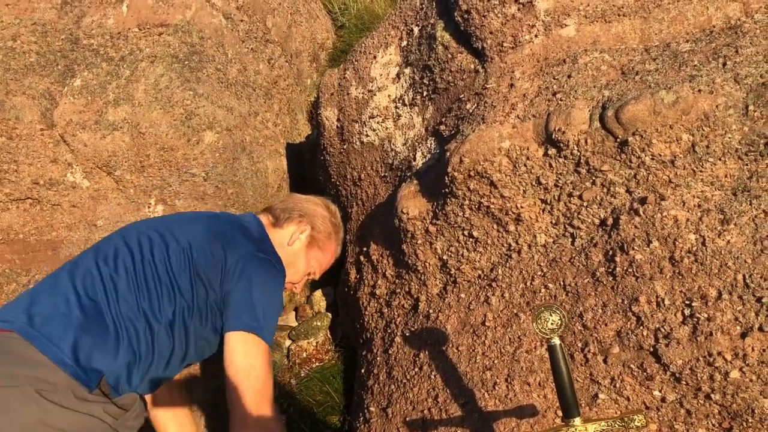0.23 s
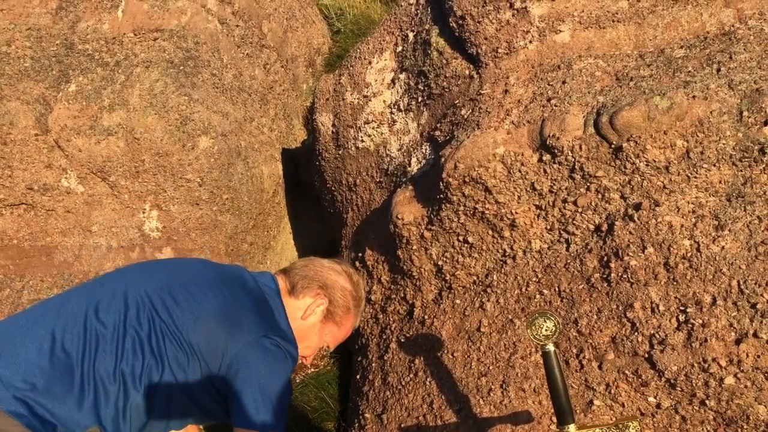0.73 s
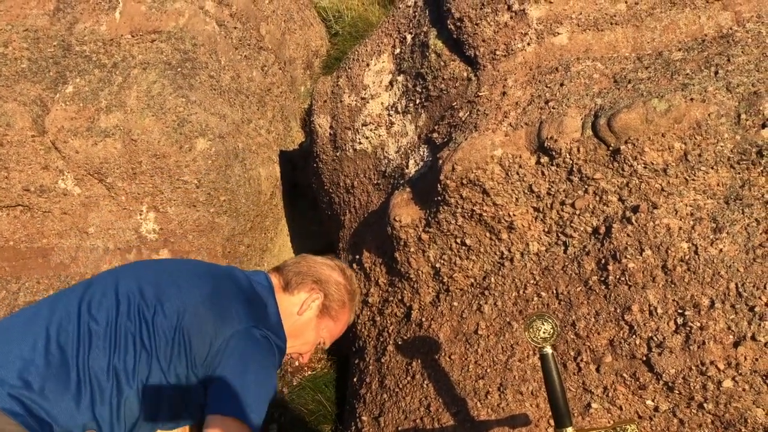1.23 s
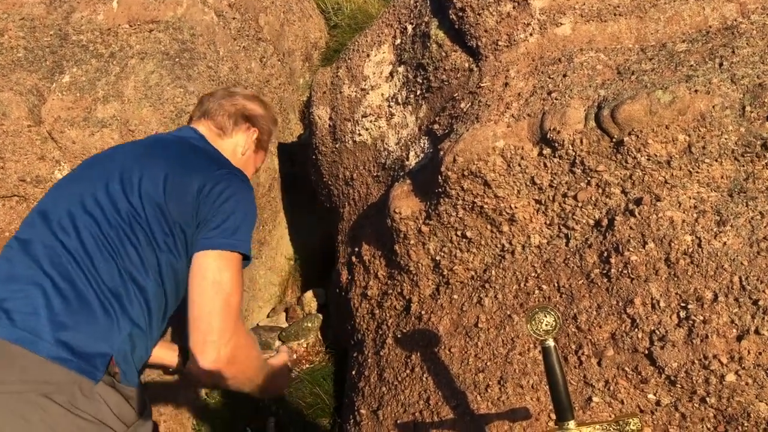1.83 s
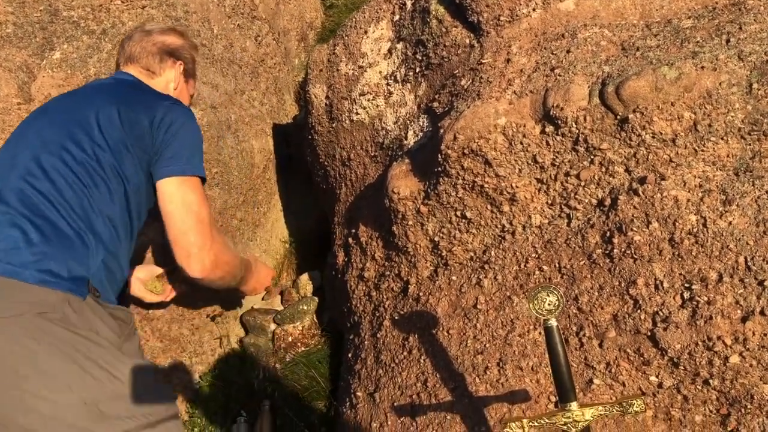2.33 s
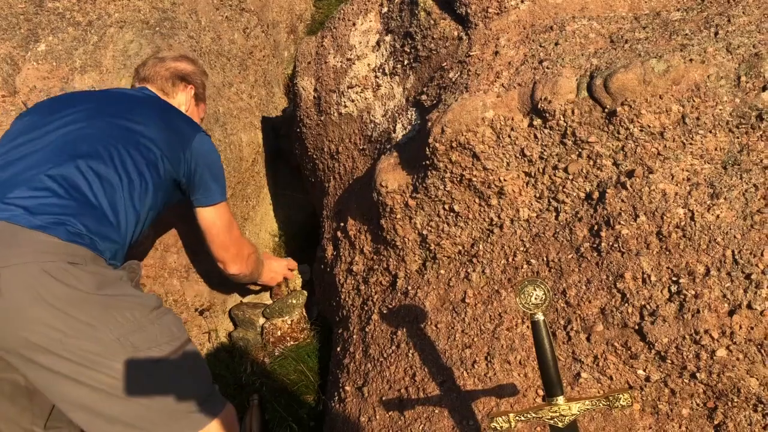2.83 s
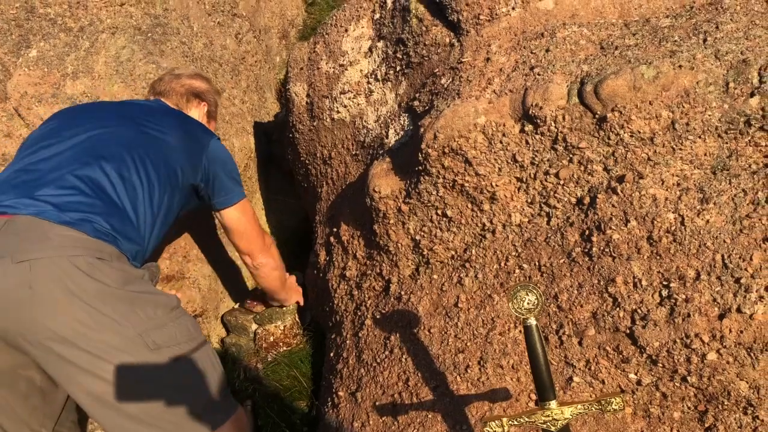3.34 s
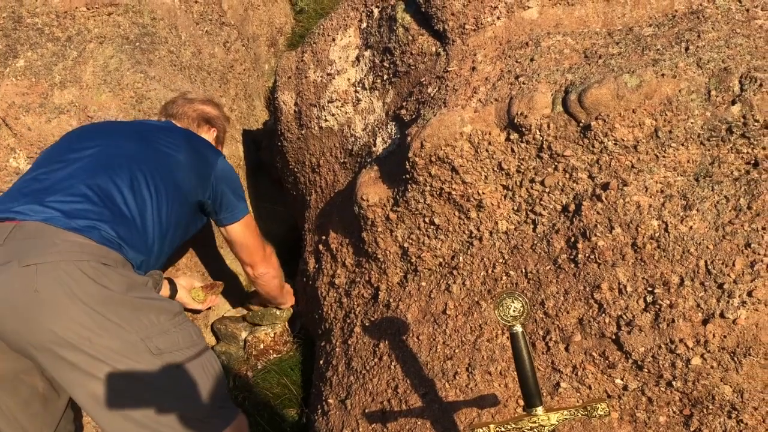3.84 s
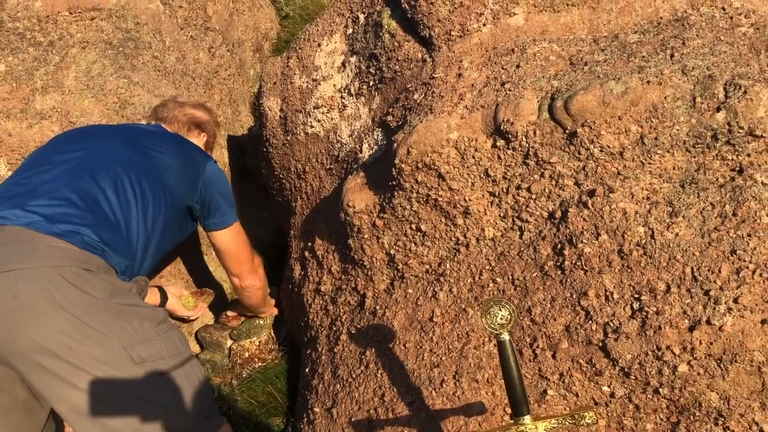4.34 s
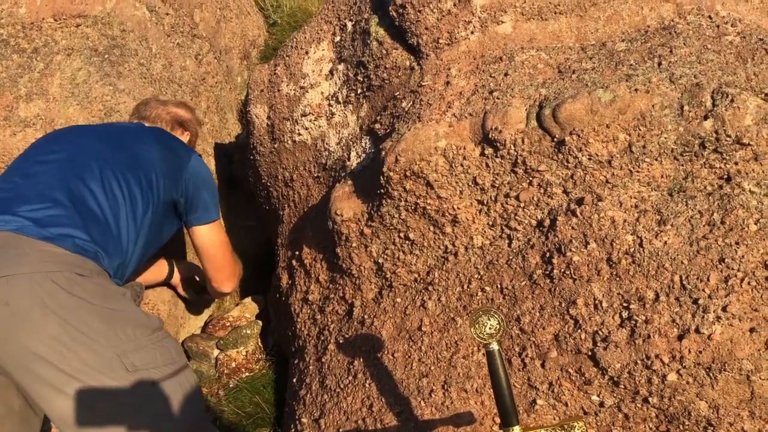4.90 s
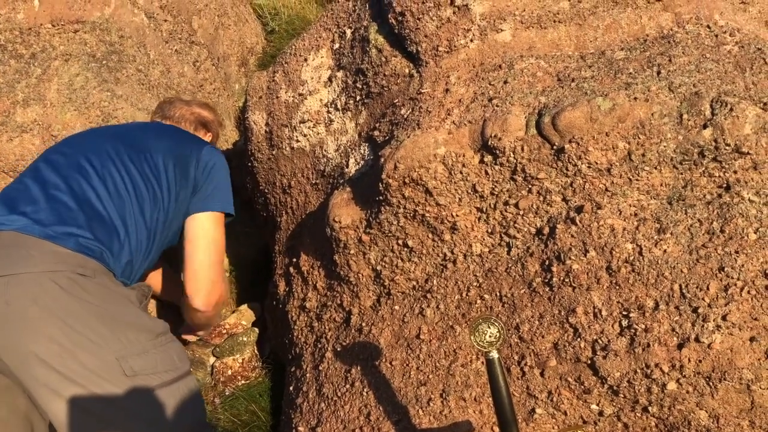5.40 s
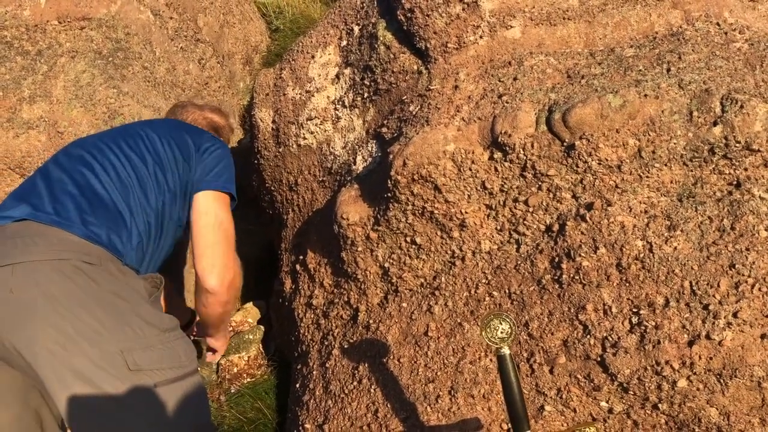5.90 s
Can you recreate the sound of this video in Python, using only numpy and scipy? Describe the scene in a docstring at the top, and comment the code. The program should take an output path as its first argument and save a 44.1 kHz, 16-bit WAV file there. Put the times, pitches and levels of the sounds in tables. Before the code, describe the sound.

Outdoors in a cleft between rocks, a microphone a step away hears a low, faint rumble of distant air. From 0 to 2.2 s there are only very soft rubs of cloth and grit, with isolated tiny snaps and one barely audible stone touch at 0.2 s. The rustle brightens around 2.3 s and again, strongest, at 2.6 to 2.7 s. At 2.98 s a stone hits stone: one hard, mid-pitched clack, far louder than everything else, with a quick rattle of rebounds until 3.1 s. Lighter knocks follow at 3.25 to 3.4 s, then 3.65 to 4.05 s, with short gritty grinding and faint high chip rings; the one at 3.86 s is strongest. From 4.1 to 5.45 s it is almost silent, with slight rustle and grains. At 5.49 to 5.67 s several dry knocks and a scrape sound, then faint ticks until about 6.1 s.

```python
"""Outdoors, in a cleft between rocks: fist-sized stones are set on a small pile, a step from a microphone.
Knocks are short contact pulses that excite damped modes; chips ring singly at high modes.
Grinding is a dense train of random slips, partly ringing the stones; snapping grit is band-passed noise.
Cloth and grit rustle as shaped random grains while the body shifts, over a low rumble of far air."""
import sys
import numpy as np
from scipy import signal
from scipy.fft import rfft, irfft
from scipy.io import wavfile
from scipy.ndimage import uniform_filter1d

SR = 44100
rng = np.random.default_rng(int(sys.argv[2]) if len(sys.argv) > 2 else 0)


def wrap_up_sound(samples):
    """Save the sound to the file named by the first command line argument, as 16-bit audio."""
    columns = np.atleast_2d(samples).T
    # keep every value between -1 and 1, then stretch to whole-number steps
    tamed = np.clip(columns, -1, 1)
    steps = np.round(tamed * 32767).astype(np.int16)
    wavfile.write(sys.argv[1], SR, steps)


N = 271656  # samples


def gain_of(db):
    """Level definition: amplitude ratio from decibels."""
    return 10 ** (np.asarray(db) / 20)


def evened(x):
    """Normalisation to unit root-mean-square amplitude."""
    return x / np.sqrt(np.mean(x ** 2) + 1e-20)


def read(points, hz):
    """Spectral interpolation: levels of a (frequency, level) table on a logarithmic frequency axis."""
    f, level = np.transpose(points)
    return np.interp(np.log(hz + 1), np.log(f + 1), level)


def curve(rows, column):
    """Envelope interpolation: one column of a table, sample by sample; near silence outside its span."""
    rows = np.array(rows)
    return np.interp(np.arange(N) / SR, rows[:, 0], rows[:, column], left=-150, right=-150)


def add(mix, s, sound):
    """Superposition: a sound is summed into the mix from time s on."""
    part = mix[round(s * SR):][:len(sound)]
    part += sound[:len(part)]


def band(x, lo_hz, hi_hz):
    """Band-pass filtering with a Butterworth response."""
    edges = [lo_hz, min(hi_hz, SR / 2.1)]
    return signal.sosfilt(signal.butter(2, edges, "band", fs=SR, output="sos"), x)


def coloured(x, points):
    """Spectral shaping: the spectrum is weighted by a table, then brought to unit RMS."""
    weight = gain_of(read(points, np.fft.rfftfreq(len(x), 1 / SR)))
    return evened(irfft(rfft(x) * weight, len(x)))


def ring(modes, t, detune=1):
    """Modal decay: exponentially damped sines, one row a mode."""
    hz, db, t60 = (c[:, None] for c in np.transpose(modes))
    return gain_of(db - 60 * t / t60) * np.sin(2 * np.pi * hz * detune * t)


def clicks(per_s, spread_db):
    """Random impulse train: sparse clicks of random sign, a few of them large."""
    size = gain_of(spread_db * np.minimum(rng.exponential(1, N), 4)) * rng.choice([-1, 1], N)
    return size * (rng.random(N) < per_s / SR)


def strokes(rows, rise):
    """Envelope of friction strokes: linear rise in dB, hold and fade; the strongest stroke governs.

    Rows: (time full level is reached [s], hold [s], level [dB], fade [dB/s]); rise in dB/s.
    """
    t = np.arange(0, N / SR, 1 / 2000)
    full, hold, db, fade = (c[:, None] for c in np.transpose(rows))
    before = np.maximum(full - t, 0)
    after = np.maximum(t - full - hold, 0)
    gain = gain_of(db - rise * before - fade * after).max(0)
    return np.interp(np.arange(N) / SR, t, gain)


# Modes of the stones, before detuning and added damping:
# (frequency [Hz], level [dB], 60 dB decay time [s])
STONE_MODES = [(403.6, 7.5, 0.035), (640, 6, 0.11), (879, 1, .04), (1147, -4, 0.063), (1310, 5.5, 0.01),
               (1390, -5.5, 0.02), (1700, 2.5, 0.045), (1959, -11, 0.01099), (2025, -16.5, 0.012),
               (2646, -2, 0.0061), (2833, -2.5, 0.032), (3300, -9.5, 0.029), (3830, 2, 0.0047)]
# Higher modes of the pile, short and quick to build up:
# (frequency [Hz], level [dB], 60 dB decay time [s])
PILE_MODES = [(2510, 0, .011), (2900, -3, 0.016), (3380, -9, .009)]
# Reflections from rock faces close by: (delay [s], level [dB])
ROCK_ECHOES = [(.0034, -17), (.0049, -21), (.0071, -19.5)]
HARD_CYCLES, CYCLES_PER_DB = 0.44, 0.0252  # clack rise in cycles at 0 dB; softer blows last longer
REBOUND_S, DAMPING = 0.001539, 0.72  # delay of the second touch; factor on the stones' decay times
MIDDLE_T60, LOWER_T60 = 0.031, 0.016  # decay times of the two single modes [s]


def knock(db, hz, rebound_db, ring_db, tick_db, thud_db, high_db, middle_db, middle_hz, lower_db, lower_hz, chance):
    """Impact excitation: a contact pulse drives modes near its pitch, then rebounds and is reflected."""
    t, count = np.arange(4000) / SR, len(STONE_MODES)
    rise = t * hz / (HARD_CYCLES - CYCLES_PER_DB * db)
    clack = np.sin(2 * np.pi * hz * t) * rise ** 2 * np.exp(2 - 2 * rise)

    # modes far from the clack's pitch are excited less
    mode_hz = np.array(STONE_MODES)[:, :1]
    reach = gain_of(-12 * np.log2(mode_hz / hz) ** 2 + 2.502 * chance[:count, None])
    detune = 1 + 0.023 * chance[count:2 * count, None]
    body = (reach * ring(np.array(STONE_MODES) * [1, 1, DAMPING], t, detune)).sum(0)
    singles = [(middle_hz, middle_db, MIDDLE_T60), (lower_hz, lower_db, LOWER_T60)]
    body = gain_of(ring_db) * body / abs(body).max() + ring(singles, t).sum(0)
    body *= (1 - np.exp(-t / 0.00099)) ** 2  # the ring builds up while the contact lasts

    noise = chance[-len(t):]
    grit = band(noise, 2600, 6000) + 0.63 * band(noise, 3700, 12000)
    tick = grit * (gain_of(-60 * t / 0.0059) + 0.1192 * gain_of(-60 * t / 0.069))  # fast and slow decay
    thud = evened(band(noise[::-1], 220.9, 1100)) * (1 - np.exp(-t / 0.0057))
    thud *= gain_of(thud_db - 60 * t / 0.035)
    upper = gain_of(high_db) * ring(PILE_MODES, t).sum(0) * (1 - np.exp(-t / 0.00058)) ** 2

    blow = clack + upper + body + gain_of(tick_db) * tick + thud
    sound = blow.copy()
    for s, echo_db in [(REBOUND_S, rebound_db)] + ROCK_ECHOES:
        add(sound, s, gain_of(echo_db) * blow)
    return gain_of(db) * sound / abs(sound).max()


# Blows of stone on stone; the part levels are gains beside the clack:
# (time [s], peak level [dB], clack pitch [Hz], second touch [dB], ring [dB], sharp tick [dB], thud [dB],
#  pile modes [dB], single middle mode [dB], its frequency [Hz], lower mode [dB], its frequency [Hz])
STONE_BLOWS = [(0.209, -58, 950, -1, 5, -10, -20, -15, -16, 1490, -12, 993),
               (2.954, -52.5, 1600, -3.5, -8.5, -22, -24.5, -10, -7, 1730, -10, 1200),
               (2.966, -51.5, 1520, -3, -9.5, -24.5, -24.5, -14, -10, 1750, -9, 1200),
               (2.977, -6, 1500, -5, -22, -22, -29, -9.5, -1.5, 1710, -7, 1186),
               (2.989, -23, 1070, 4, -15, -26, -20, -13, -11, 1450, -20, 1145),
               (3.008, -26.5, 1280, 0, -5, -41, -27, -26, -9, 1490, -17, 1260),
               (3.014, -46, 1190, -21, -9, -24, -28, -19, -18, 1440, -15, 1200),
               (3.02, -32, 1110, -10, -2, -29.5, -19, -22, -4, 1437, -13, 1081),
               (3.028, -34, 1210, -10, -6, -22, -19, -19, -19, 1470, -19, 1235),
               (3.036, -28, 1470, -11, -15, -48, -14, -32, 5, 1627, -6, 1320),
               (3.048, -33.5, 1240, -7, 8, -36, -26, -27, -19, 1490, -15, 1350),
               (3.055, -34.5, 1560, -3, -19, -46, -26, -27, 24, 1630, -11, 1220),
               (3.077, -47.5, 1130, 8, -13, -31, -24, -18, -16, 1440, -16, 1140),
               (3.083, -43, 1040, 17, -18, -33, -28, -23, -8, 1590, -10, 1020),
               (3.103, -50, 1000, -13.5, -5, -25, -22, -20, -17, 1570, -2, 802),
               (3.217, -48.5, 1150, -19.5, -6, -17.5, -10, -18, -18, 1463, -5, 851),
               (3.252, -38.5, 1130, 11, 5.5, -28, -18, -12, -8, 1670, -19, 1170),
               (3.277, -43.5, 1100, -4, -12, -23, -17, -21, -24.5, 1440, 7, 805),
               (3.303, -35.5, 1150, -12, 2.5, -36, -20, -22, 3, 1640, -13, 1260),
               (3.362, -22, 2080, -5.5, 7.5, -23.5, -14.5, -21, -12, 1925, -10, 1217),
               (3.367, -43, 1760, -14, -8, -36, -21, -13, -1, 1670, -18, 915),
               (3.419, -29.5, 1710, -7, -4, -30.5, -2, -23, 10.5, 1715, -12, 1120),
               (3.656, -27, 1920, -10, -2.5, -48, -12, -12, -30, 1860, -5.5, 1190),
               (3.724, -36, 1780, 9, -21, -35, -6, -18, -10, 1820, -0.5, 880),
               (3.798, -34, 1500, 7, 7, -23, -28, -8, -22, 1640, 5, 980),
               (3.83, -39.5, 1680, 4, -4, -17, -13, -9, -17, 1640, -12, 888),
               (3.855, -37, 1720, 7, -11, -30, -26, -18, -9, 1670, -15, 866),
               (3.864, -18, 1440, -16, -25, -37, -29, -11, -16, 1560, -20, 1340),
               (3.877, -29, 1550, 7, -9, -37, -17, -14, -6, 1640, -11, 1350),
               (3.899, -45.5, 1070, -14, -6, -34, -24, -13, -6, 1570, -11, 1060),
               (3.929, -45, 948, 0, -15, -28, -24, -15, 12, 1620, -12, 939),
               (3.96, -46, 1340, -12, 1, -22, -28, -19, -1, 1440, -12, 1340),
               (3.968, -45, 930, -9, -6, -6, -21, -17, 3, 1430, -10, 921),
               (4.022, -28.5, 1490, -13, -24, -18, -6, -19, 5, 1507, -22, 1380),
               (4.026, -30.5, 1523, -20, -17, -34, 2, -15, -17, 1610, -21, 1340),
               (4.032, -31, 1540, -12, -22, -38, -25, -17, 7, 1655, 11, 880),
               (4.06, -48, 930, -5, 5, -25, -11, -5, -1, 1466, -12, 923),
               (5.486, -25.5, 1720, -5.5, -18, -3, -24, 0, 8, 1716, 7, 920),
               (5.552, -21, 1640, -25, 0, -20.5, -26, -4, -10, 1580, -1, 1350),
               (5.567, -50, 1010, 7, -8, -25, -26, -15, -12, 1660, -12, 996),
               (5.575, -25.5, 1900, -8, -9, -28, -13, -9, -4, 1677, -2, 1360),
               (5.587, -31.5, 1230, -14, -9, -36, -30, -11, -17, 1680, -12, 1170),
               (5.605, -53, 883, -9, 7, -22, -15, -12, -12, 1470, -9, 802),
               (5.6106, -23, 1610, -23, -25, -28, -13, -5, -12, 1640, -11, 1290),
               (5.671, -35.5, 1600, -11, -16, -31.5, -2, -21, -5, 1720, 7, 1080),
               (5.934, -47.5, 1610, -18, -12, -11, -32, -6, -11, 1610, 1, 914),
               (6.007, -54, 990, 8, -16.5, -11, -16.5, -12, -6, 1510, -13, 1020),
               (6.102, -44.5, 1240, 15, 11.5, -45.5, -28.5, -17, -17.5, 1640, -13, 1238)]


def knocks():
    """Superposition of impacts: every blow is added at its time."""
    out, chance = np.zeros(N), rng.standard_normal((len(STONE_BLOWS), 4100))
    for (s, *row), c in zip(STONE_BLOWS, chance):
        add(out, s, knock(*row, c))
    return out


# Single chips ringing out; level before the soft start: (time [s], level [dB], frequency [Hz])
CHIP_RINGS = [(2.978, -38, 5670), (3.0074, -71, 6580), (3.0354, -69, 6130), (3.0495, -68, 6750),
              (3.3857, -68, 6640), (3.6556, -57.5, 6650), (3.7973, -57.5, 8100), (3.8337, -58.5, 8200),
              (3.8774, -60, 8170), (4.0218, -55, 6480), (4.0314, -59, 6650), (4.0522, -63, 6480),
              (4.065, -65, 6660), (4.0844, -69, 6280), (5.4846, -47.5, 7660), (5.494, -56, 8000),
              (5.5513, -61, 7800), (5.612, -62, 8000)]


def chinks():
    """Free vibration of a single mode: a damped high sine with a soft start."""
    out, t = np.zeros(N), np.arange(3000) / SR
    onset = 1 - np.exp(-t / 0.00045)
    for s, db, hz in CHIP_RINGS:
        add(out, s, ring([(hz, db, 0.024)], t)[0] * onset)  # 60 dB decay time in s
    return out


# Stones rocking and grinding while they settle:
# (time full level is reached [s], hold [s], level [dB], fade [dB/s])
GRIND_STROKES = [(2.99, 0.028, -49.5, 232), (3.045, 0.021, -61, 249.5), (3.24, 0.065, -66, 220),
                 (3.375, 0.0018, -52, 499.5), (3.658, 0.025, -57.5, 500), (3.735, .002, -56, 800),
                 (3.78, .01, -59, 300), (3.8, 0.087, -50, 700), (3.935, .002, -56, 450),
                 (3.97, .002, -54, 600), (4.04, 0.014, -54.5, 270), (5.497, 0.0031, -51, 900),
                 (5.578, 0.017, -49, 700), (5.63, 0.0022, -57.5, 900), (5.68, .002, -54.5, 896),
                 (6.0, .08, -77, 300), (6.11, .002, -65, 261)]
# Spectrum of rough faces sliding: (frequency [Hz], level per Hz [dB])
SLIP_SPECTRUM = [(120, -35.5), (200, -3), (343, 5), (759, -6), (880, 4.5), (1320, -9), (1680, -3.5),
                 (1900, -10), (2700, -14), (3400, -27.5), (5000, -40), (6500, -68.5), (11000, -120)]
# Modes of small chips: (frequency [Hz], level [dB], 60 dB decay time [s])
CHIP_MODES = [(6216, -7, 0.02014), (6695, 0, 0.014), (8120, -5, 0.023), (12910, -2.5, 0.0351)]
GRIND_RISE, GRIND_CHIPS_DB = 2200, -25  # rise [dB/s]; chips against the grind [dB]


def grind():
    """Stick-slip friction: dense uneven slips of rough faces, some ringing a damped stone or chip mode."""
    t = np.arange(3000) / SR
    stone_modes = ring(np.array(STONE_MODES) * [1, 1, 0.6], t) * (1 - np.exp(-t / 0.00035))
    stones = evened(sum(signal.oaconvolve(clicks(146.6, 0.95), m)[:N] for m in stone_modes))
    slips = coloured(clicks(2600, 3), SLIP_SPECTRUM)
    chips = evened(sum(signal.oaconvolve(clicks(99.35, 3), m)[:N] for m in ring(CHIP_MODES, t)))
    friction = evened(slips + 0.7 * stones) + gain_of(GRIND_CHIPS_DB) * chips
    return strokes(GRIND_STROKES, GRIND_RISE) * friction


# Single grains of grit snapping:
# (time [s], peak level [dB], pitch [Hz], decay time constant before filtering [s])
GRIT_SNAPS = [(0.027, -48, 11100, 0.0016), (0.074, -50, 6900, 0.00073), (0.18, -50.5, 5930, 0.00098),
              (0.202, -48, 8780, 0.00094), (0.381, -42.5, 3600, 0.00037), (0.388, -47, 9020, 0.0014),
              (0.8425, -46, 6500, 0.0019), (0.9472, -50, 3980, 0.0015), (1.177, -53, 5930, 0.00133),
              (1.268, -45.5, 5400, 0.004), (1.373, -56, 9900, 0.0014), (1.73, -48.5, 10600, 0.0021),
              (1.9325, -54.5, 9910, 0.0013), (2.162, -51.5, 6010, 0.0013), (2.192, -53, 10500, 0.0013),
              (2.2594, -60, 5360, 0.00115), (2.295, -45, 5100, 0.00091), (2.301, -41.5, 5200, 0.0022),
              (2.745, -45, 5900, 0.00057), (2.79, -64, 7780, 0.0015), (3.2084, -46, 6200, 0.0031),
              (3.245, -55, 4885, 0.00134), (3.6845, -56.5, 6640, 0.0015), (3.7798, -55, 8210, 0.0011),
              (3.854, -44, 3660, 0.00078), (4.906, -55, 4110, 0.001205), (5.042, -54, 3760, 0.0016),
              (5.114, -57, 6110, 0.0015), (5.723, -62, 6250, 0.0015), (5.932, -53.5, 4060, 0.00104)]


def snaps():
    """Band-limited noise bursts: each decays exponentially and is filtered around its pitch."""
    out, t = np.zeros(N), np.arange(1500) / SR
    chance = rng.standard_normal((len(GRIT_SNAPS), 1500))
    for (s, db, hz, length), c in zip(GRIT_SNAPS, chance):
        burst = band(c * np.exp(-t / length), hz / 2, hz * 1.65)
        add(out, s, gain_of(db) * burst / abs(burst).max())
    return out


# Uneven background rustle between the rubs: (time [s], level [dB])
BACKGROUND_RUSTLE = [(0, -76), (.25, -70), (.6, -72.5), (.9, -73.5), (1.2, -68), (1.32, -77), (1.7, -78.5),
                     (2.1, -75), (2.25, -63.5), (2.55, -72.5), (2.8, -71.5), (3.0, -79.5), (3.15, -76.5),
                     (3.3, -93), (3.8, -75), (4.0, -80), (4.9, -89.5), (5.0, -74), (5.3, -88.5), (5.9, -80),
                     (6.16, -85)]
# Separate rubs of cloth and grit:
# (time full level is reached [s], hold [s], level [dB], fade [dB/s], duller part against it [dB])
CLOTH_RUBS = [(0.082, .01, -69.5, 150, -19), (0.335, 0.035, -67, 200, -13), (0.62, .02, -70, 300, -16),
              (0.853, .005, -70, 300, -23), (1.12, 0.034, -67.5, 200, -38), (1.268, .002, -59.5, 700, -11),
              (1.336, .02, -72.5, 600, -22), (1.371, .005, -63.5, 600, -18), (1.728, .02, -71, 92, -16),
              (1.943, .01, -70.5, 52, -27), (2.273, 0.072, -60, 200, -20), (2.314, 0.0054, -53.5, 286, -19),
              (2.379, 0.065, -61.5, 370, -12), (2.584, .02, -63, 300, -6), (2.621, 0.012, -51.5, 300, -4.5),
              (2.673, 0.0091, -50, 350, -5.5), (2.996, .001, -56, 2198.5, -9),
              (3.193, .01, -67.5, 247, -10), (3.418, .002, -77.5, 700.5, -6), (3.575, .005, -74.5, 200, -2),
              (3.718, .005, -74, 400, -4), (3.862, .002, -64, 349, -3), (4.047, .01, -71, 200, -10),
              (4.133, .01, -75, 100, -8), (4.322, 0.0047, -79.5, 179.5, -9.5), (4.555, 0.078, -81, 901, 1),
              (4.908, .002, -78.5, 598.5, -5), (5.006, .04, -77, 64, 2), (5.415, 0.038, -77.5, 349, -10.5),
              (5.5, .002, -80.5, 897, -6.5), (5.63, .005, -72, 281, -14.5),
              (5.726, .002, -76.5, 899.5, -13.5), (5.924, .008, -74, 452, -7),
              (6.063, .01, -71.5, 599.5, 0)]
# Spectral weight of the bright grains: (frequency [Hz], level per Hz [dB])
RUSTLE_SPECTRUM = [(880, -25), (1500, -7.5), (2450, -1), (3430, 0), (5560, 0), (6970, -1.5), (7770, 0),
                   (15800, -3.5)]
RUB_RISE, RUSTLE_LOW_DB = 600, -15.5  # rise [dB/s]; duller part of the background rustle against it [dB]


def rustle():
    """Granular friction noise: dense fine grains under an uneven stroke, with a duller part below."""
    grains = evened(clicks(4000, 2.524)) + 2.4 * rng.standard_normal(N)
    wander = evened(uniform_filter1d(rng.standard_normal(N), 300))
    flutter = evened(gain_of(1.9 * wander))
    low = evened(band(clicks(1500, 2.9), 471, 1800))
    background = gain_of(curve(BACKGROUND_RUSTLE, 1))
    bright = np.maximum(background, strokes([row[:-1] for row in CLOTH_RUBS], RUB_RISE))
    dull_rubs = [(s, hold, db + low_db, fade) for s, hold, db, fade, low_db in CLOTH_RUBS]
    dull = gain_of(RUSTLE_LOW_DB) * background + strokes(dull_rubs, RUB_RISE)
    return flutter * (bright * coloured(grains, RUSTLE_SPECTRUM) + dull * low)


# Spectrum of far air, before its two bands are levelled: (frequency [Hz], level per Hz [dB])
AIR_SPECTRUM = [(12, -47), (20, -26), (53, -4.5), (126, -5), (145, -10), (177, -3.5), (215, -13),
                (269, -10.5), (398, -13.5), (484, -14), (572, -15.5), (870, -19.5), (1700, -26.5),
                (2660, -33), (15900, -45)]
# Slow swell of the air: (time [s], level above 150 Hz [dB], level below 150 Hz [dB])
AIR_LEVELS = [(0, -68.5, -63.5), (2, -67.5, -65.5), (4, -67, -67.5), (5, -68.5, -68), (6.16, -66, -65.5)]


def air():
    """Shaped random noise: low rumble and faint hiss of far wind, each swelling slowly."""
    x = coloured(rng.standard_normal(N), AIR_SPECTRUM)
    low = signal.sosfiltfilt(signal.butter(2, 150, fs=SR, output="sos"), x)
    hiss = gain_of(curve(AIR_LEVELS, 1)) * evened(x - low)
    rumble = gain_of(curve(AIR_LEVELS, 2)) * evened(low)
    return hiss + rumble


def cleft(x):
    """Diffuse reverberation: convolution with a short decaying noise tail between rough rock walls."""
    t = np.arange(5000) / SR
    tail = rng.standard_normal(len(t)) * gain_of(-60 * t / 0.094) * (t > 0.004)
    return signal.oaconvolve(x, tail / np.linalg.norm(tail))[:N]


def scene():
    """Superposition of sources: impacts with their reverberation, friction and background air."""
    near = knocks() + chinks() + snaps()
    return (near + gain_of(-26.5) * cleft(near) + grind() + rustle() + air())[None]


EDGE_HZ = 15750  # upper band limit


def record(dry):
    """Band limitation: the microphone drops the deepest bass, the recorder the highest treble."""
    thin = signal.sosfilt(signal.butter(2, 28, "high", fs=SR, output="sos"), dry)
    lowpass = signal.firwin(511, EDGE_HZ, window=("kaiser", 9), fs=SR)
    return signal.oaconvolve(thin, lowpass[None], "same")


dry = scene()
out = record(dry)
wrap_up_sound(out)
```